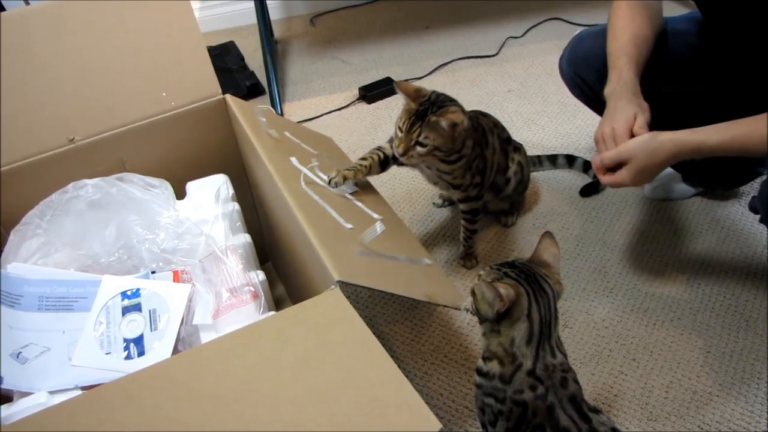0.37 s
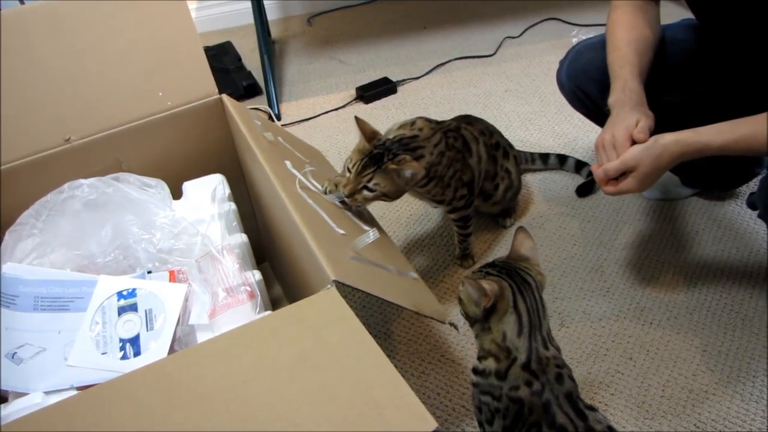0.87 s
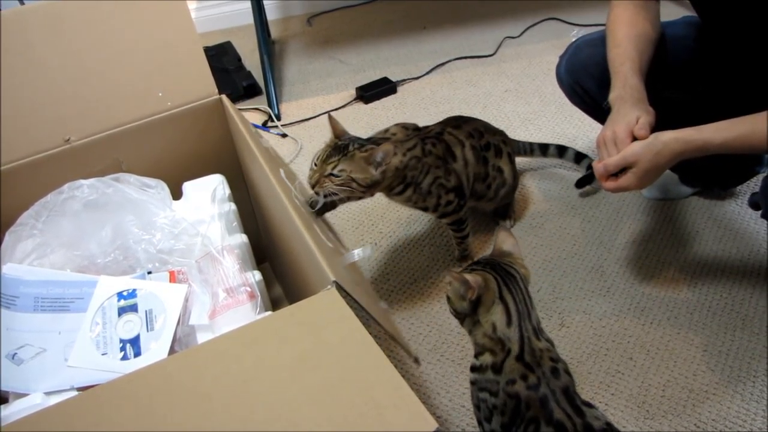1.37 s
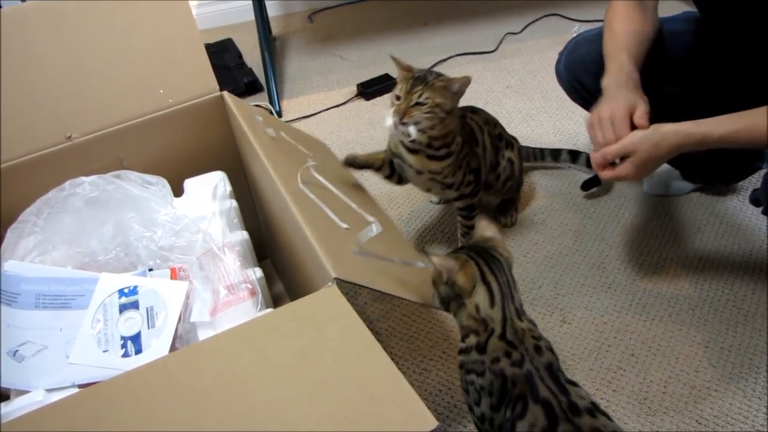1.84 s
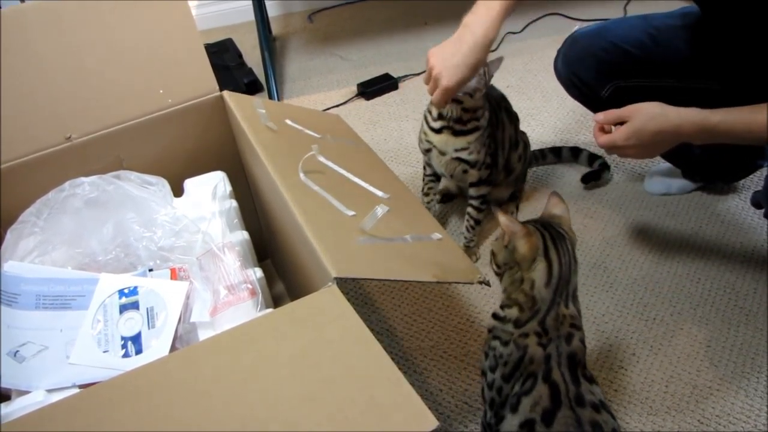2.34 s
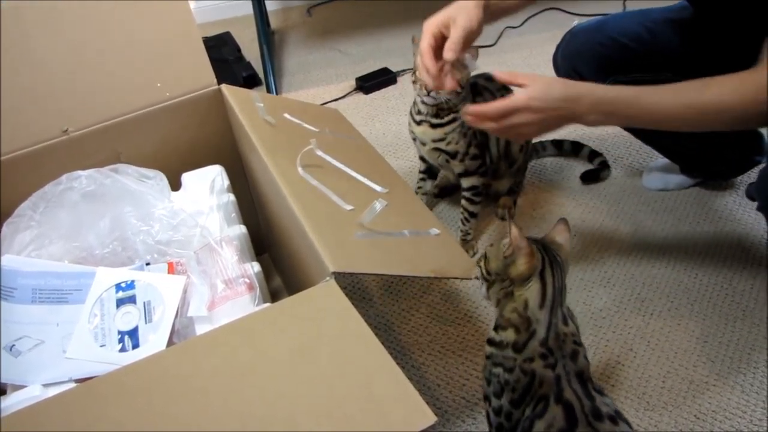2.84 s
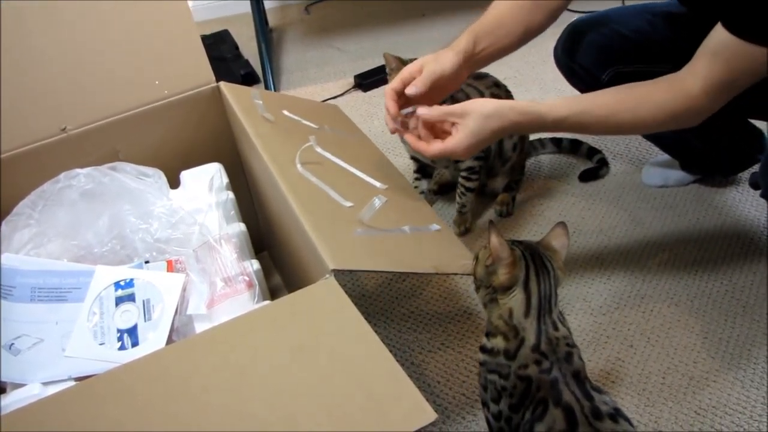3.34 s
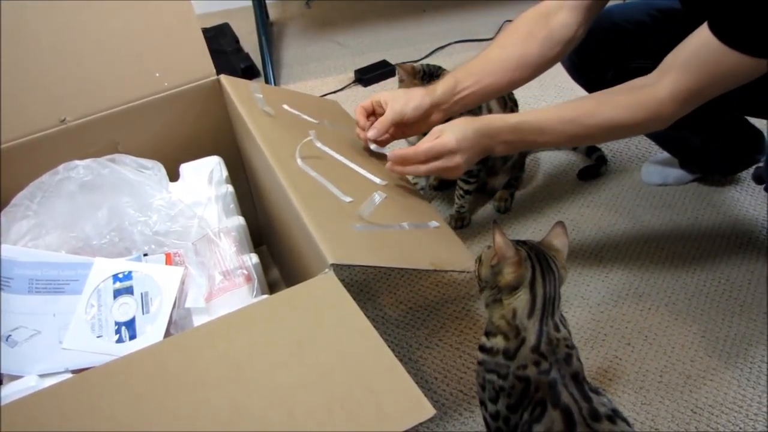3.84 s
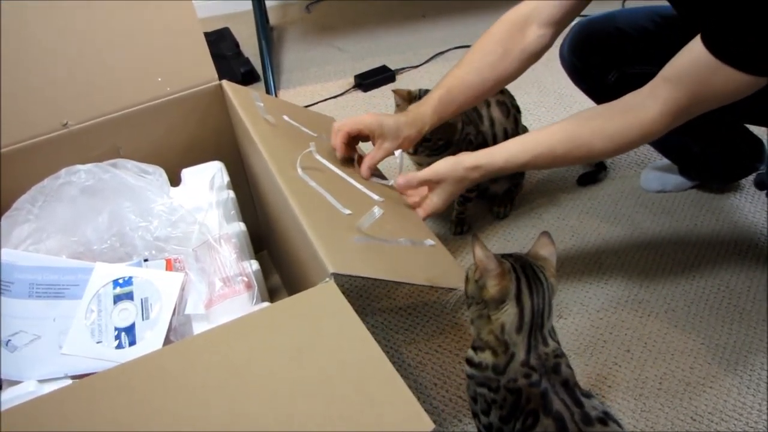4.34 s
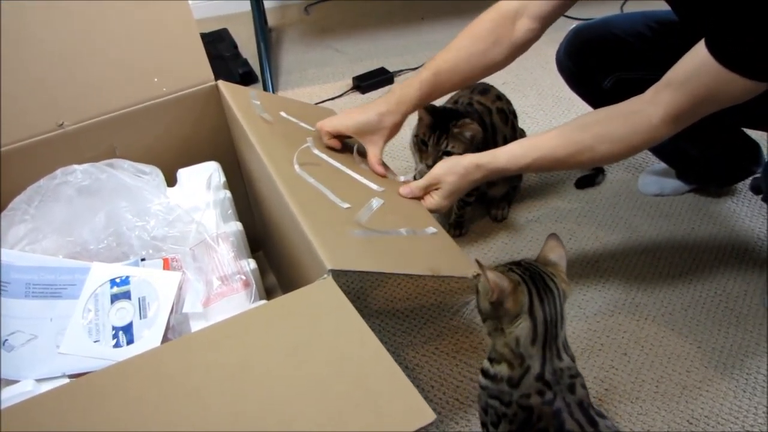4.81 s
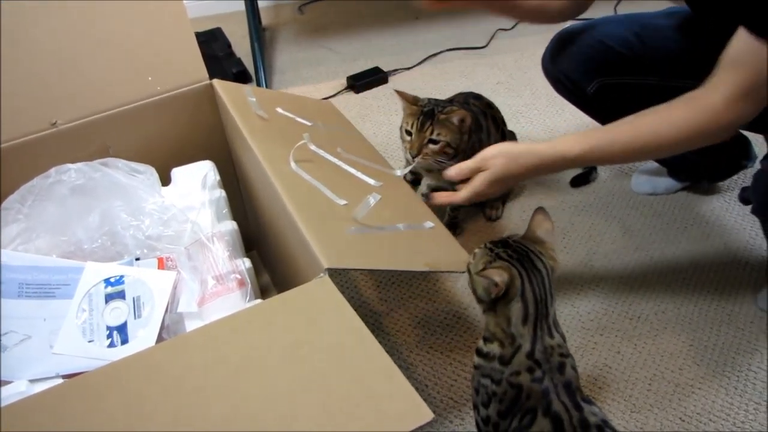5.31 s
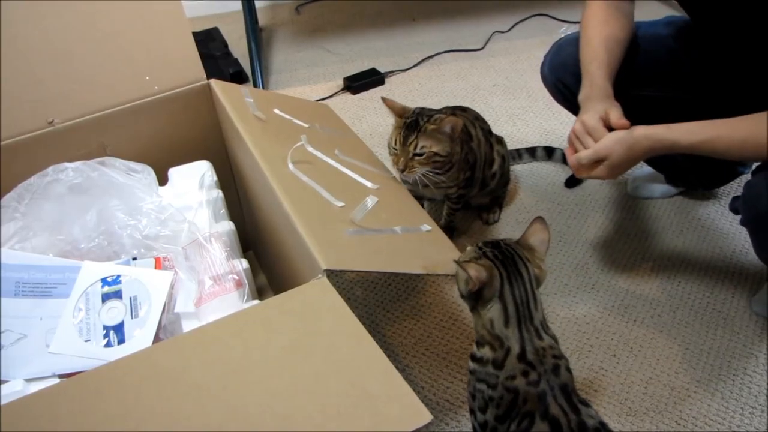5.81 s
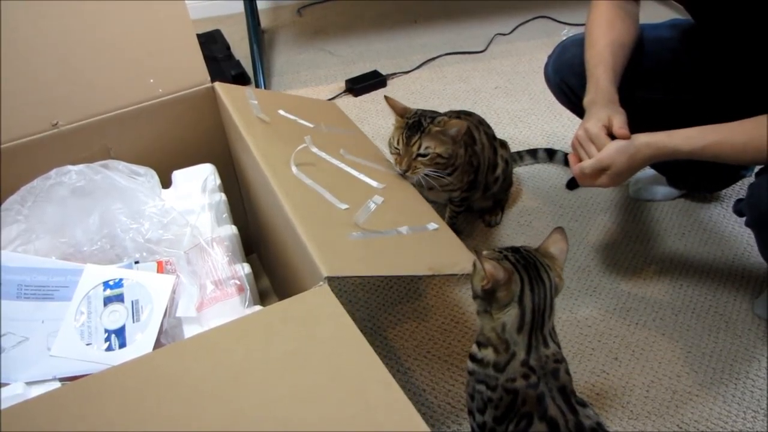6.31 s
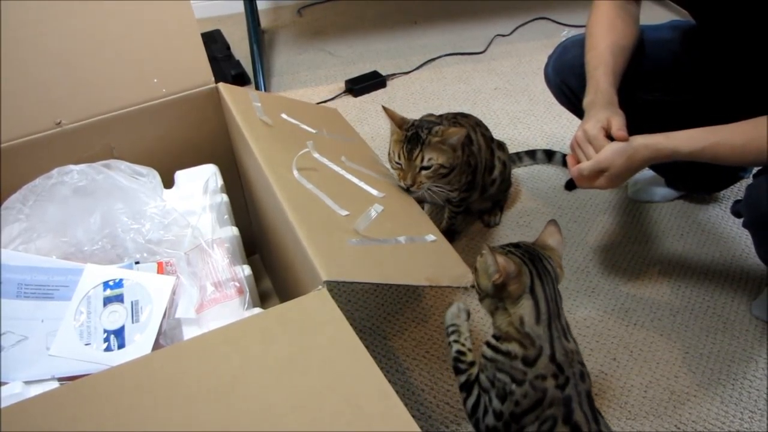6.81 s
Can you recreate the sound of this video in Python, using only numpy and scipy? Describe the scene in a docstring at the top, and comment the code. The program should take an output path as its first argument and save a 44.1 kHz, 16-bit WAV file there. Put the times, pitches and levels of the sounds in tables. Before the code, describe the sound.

Dry, near sounds of packing tape and cardboard over steady quiet air noise. Light claw strokes and isolated clicks build to a sharp crackling rip before two seconds. A lull gives way to crisp tape ticks, then deep box thumps, finger rubs and snappy crinkles around four and a half to five seconds. Small uneven scratches finish, with a short, soft room response.

```python
"""In a carpeted room, cats paw, claw and tug at packing tape on the flap of a cardboard box; hands press it back.
Glue letting go and tape buckling give snaps: short decaying tones with bright cracks, in one place a dense rip.
Strokes make bursts of tiny slips, coloured as cardboard scrape and tape crinkle.
Blows thump by ringing the flap's modes; its swings are swells of low noise.
A steady ventilation and microphone hush lies beneath, and decaying noise tails answer as the room."""
import sys
import numpy as np
from scipy import signal
from scipy.fft import rfft, irfft, next_fast_len
from scipy.io import wavfile
from scipy.ndimage import uniform_filter1d

SR = 44100
rng = np.random.default_rng(int(sys.argv[2]) if len(sys.argv) > 2 else 0)


def level_to_linear(level):
    """Convert decibel levels to linear amplitude factors, elementwise."""
    exponent = np.asarray(level, float) / 20
    return 10 ** exponent


def waveform_to_disk(signal):
    """Save audio, clipped to [-1, 1], as 16-bit WAV at the path in sys.argv[1]."""
    frames = np.transpose(np.atleast_2d(signal))
    scaled = np.clip(frames, -1, 1) * 32767
    samples = np.round(scaled).astype(np.int16)
    wavfile.write(sys.argv[1], SR, samples)


N = 305172  # length [samples]

# spectrum of ventilation and microphone noise: (frequency [Hz], level [dB per Hz])
HUSH_SPECTRUM = [(15, -51), (25, -6), (78, 1), (170, -7), (451, -9), (560, -15), (695, -15), (863, -8.5),
                 (1190, -6), (1400, -22), (2690, -24.5), (3620, -22.5), (7920, -26), (13600, -29),
                 (16000, -23.5)]
HUSH_DB = -56
# spectrum of low air pushed by the flap: (frequency [Hz], level [dB per Hz])
SWAY_SPECTRUM = [(12, -28), (20, -10), (59, 5), (97, -6), (140, -2), (159, -11), (182, -27), (250, -7),
                 (320, -102), (550, -120)]
# the flap swinging after a push: (peak time [s], length [s], level [dB])
FLAP_SWINGS = [(0.0, .2, -44.5), (0.403, .2, -50), (0.594, 0.43, -47.5), (1.15, .4, -43),
               (1.64, 0.52, -44.5), (1.766, 0.32, -41), (1.932, 0.15, -37), (2.005, .12, -41),
               (3.053, 0.23, -48), (3.22, 0.41, -50), (3.83, 0.32, -48.5), (4.09, 0.33, -43.5),
               (4.454, 0.25, -35), (4.625, .15, -49), (4.69, 0.17, -33.5), (4.903, 0.53, -48),
               (5.2, 0.37, -37), (5.33, 0.14, -38.5), (5.92, 0.66, -46), (6.11, .2, -61), (6.57, 0.33, -43)]
SWING_RISE, REST_SWAY_DB = 0.41, -56.5  # rise over fall time; tremble between the swings
# modes of the flap: (frequency [Hz], level [dB], decay by 60 dB [s])
FLAP_MODES = [(75.5, -37, 0.1), (93, 2, 0.088), (135.2, 2, 0.13), (214.5, -7, 0.34), (254.5, 7, 0.069),
              (306, 2, 0.16), (459.6, -0.5, 0.22), (618, -15.5, 0.48), (827, -3, 0.32), (1066, 7.5, 0.07),
              (1500, -24, 0.043)]
# paws and fingers landing on the flap: (time [s], peak level [dB], favoured pitch [Hz], breadth [log pitch])
FLAP_BLOWS = [(0.325, -23, 249, 0.18), (0.547, -36, 277, 0.15), (1.1, -43, 332, 0.11),
              (1.476, -36, 247, 0.86), (1.5, -44, 128, 0.26), (1.624, -28, 234, 0.21),
              (1.679, -22, 825, 0.16), (1.72, -22, 270, 0.94), (1.734, -24, 128, 0.19), (1.75, -24, 308, 1),
              (1.921, -54, 127, 0.33), (3.107, -41.5, 215, 0.47), (3.396, -53, 115, 1),
              (3.82, -34, 134, 0.56), (4.037, -38.5, 221, 0.31), (4.085, -41, 248, 0.55),
              (4.342, -34, 132, 1), (4.429, -45, 634, 0.57), (4.461, -35, 227, 0.39),
              (4.66, -14.5, 122, 0.64), (4.785, -33.5, 310, 1), (4.961, -22.5, 154, 0.94),
              (5.153, -19.5, 281, 0.13), (5.278, -28, 137, 0.17), (5.929, -43, 103, 1),
              (6.244, -37.5, 235, 0.24), (6.327, -47, 278, 0.75), (6.541, -38, 240, 0.35),
              (6.841, -41.5, 143, 0.78)]
# paw, teeth and finger strokes, rise and fall spanning 20 dB:
# (peak time [s], rise [s], fall [s], cardboard scrape level [dB], tape crinkle level [dB])
STROKE_EVENTS = [(0.0, .1, 0.14, -48, -46), (0.346, 0.018, 0.083, -33.5, -33),
                 (0.554, 0.0067, 0.087, -44, -47), (.72, 0.37, 0.12, -55.5, -58),
                 (.84, .04, 0.027, -55, -58), (.912, 0.049, 0.064, -57, -56), (.98, 0.039, 0.14, -53, -58),
                 (1.021, 0.019, 0.14, -59, -45.5), (1.101, 0.11, 0.22, -55.5, -42),
                 (1.15, 0.12, .04, -49, -52), (1.181, 0.013, .08, -43.5, -62),
                 (1.215, 0.029, 0.13, -46.5, -42), (1.29, .08, .08, -50, -54),
                 (1.386, 0.11, 0.11, -40.5, -39.5), (1.45, 0.025, 0.042, -60, -54),
                 (1.478, 0.013, 0.051, -32.5, -33), (1.566, .06, 0.037, -46, -52),
                 (1.606, 0.0069, 0.18, -38, -36), (1.676, 0.063, 0.097, -28, -22.5),
                 (1.738, 0.12, 0.088, -23, -22), (1.82, .05, 0.18, -54, -61), (1.888, .04, 0.092, -69, -58),
                 (1.959, 0.26, 0.31, -52.5, -53), (2.05, .3, 0.16, -64, -53), (2.247, .012, 0.17, -60, -48),
                 (2.373, .02, 0.16, -62, -52), (2.486, 0.024, .25, -57, -40.5),
                 (2.584, 0.1, 0.12, -74, -38), (2.621, 0.082, 0.044, -56, -32), (2.66, .03, 0.13, -68, -50),
                 (2.73, 0.046, .06, -70, -49), (2.85, 0.45, 0.13, -62.5, -47.5), (3.17, 1, 0.6, -56.5, -63),
                 (3.401, 0.011, 0.048, -40, -43.5), (3.468, 0.042, .2, -57, -52),
                 (3.668, 0.13, 0.64, -63, -47), (3.789, 0.26, .05, -69, -46),
                 (3.855, 0.15, 0.02, -55.5, -46), (3.9, .05, 0.092, -55, -75),
                 (4.042, 0.0081, 0.25, -53, -41), (4.073, 0.029, 0.21, -42, -67),
                 (4.336, 0.061, 0.091, -49, -53.5), (4.4, .012, 0.056, -40, -58),
                 (4.437, 0.054, 0.17, -30, -32.5), (4.506, 0.059, 0.085, -55, -36),
                 (4.54, 0.056, 0.12, -55, -41.5), (4.667, 0.019, .3, -44, -44.5),
                 (4.79, .015, 0.11, -40, -65), (4.86, 0.081, .1, -57, -61), (4.942, 0.14, 0.1, -50, -36),
                 (5.076, 0.32, 0.061, -37, -36), (5.18, 0.075, 0.054, -32.5, -34),
                 (5.332, 1, 0.23, -42, -45), (5.6, 0.016, .1, -51, -45), (5.64, 0.078, 0.051, -61, -41.5),
                 (5.753, 0.056, 0.046, -58, -52), (5.825, .025, 0.96, -55.5, -56),
                 (5.984, 0.86, 0.041, -54, -53), (6.176, 0.14, 0.26, -73, -88),
                 (6.241, 0.0096, .03, -46.5, -42), (6.27, 0.038, 0.26, -46.5, -51),
                 (6.352, 0.06, 0.19, -42.5, -42), (6.546, .5, .11, -50.5, -50.5),
                 (6.844, 0.23, .08, -56, -56.5), (6.88, 0.013, 0.11, -55, -53)]
REST_SCRAPE_DB = -64.5  # faint cardboard contact between the strokes
RISE_CURVE, FALL_CURVE = 0.95, 0.71  # 1 = straight in dB; less = sharper peak, longer skirt
# spectrum of scraped cardboard: (frequency [Hz], level [dB per Hz])
BOARD_SPECTRUM = [(88, -60), (150, -0.5), (270, 3.5), (530, -5), (776, -3), (1280, -4.5), (1590, -6),
                  (1930, -10), (2140, -9.5), (5000, -24), (6500, -78), (11000, -120)]
# spectrum of crinkling tape: (frequency [Hz], level [dB per Hz])
FILM_SPECTRUM = [(1200, -13), (2000, -2.5), (2450, -2), (2750, -0.5), (3100, -4), (3800, -6), (6000, -7.5),
                 (12000, -15), (16000, -8)]
# the loose strip of tape: (time [s], centre of its crinkle [Hz], strength of that centre [dB],
# brightness [dB per octave])
STRIP_COLOUR = [(0, 3900, 8, 5.5), (.35, 4160, -2, -4.5), (.85, 3830, 1, -1.5), (1.02, 6300, 2, 1),
                (1.1, 7000, 2, 6), (1.3, 7200, 1, 1.5), (1.384, 3630, 1, -0.5), (1.475, 8200, -3, -1.5),
                (1.55, 4500, -3, 2), (1.66, 5000, 4.5, 0.5), (1.78, 4900, -3, 2.5), (2.2, 4130, 7, 1),
                (2.3, 4300, 4, -4.5), (2.37, 9200, 5, -2.5), (2.48, 4800, 2, 1.5), (2.56, 6100, 14, 3),
                (2.65, 6400, -4, 3), (2.83, 3770, 1.5, 1), (3.4, 5400, 3, 1.5), (3.6, 5070, 3, 0.5),
                (3.66, 6540, 12, 1), (3.75, 6600, 2, 3), (3.79, 8600, 10, -1), (3.87, 8800, -4, 5),
                (4.04, 3900, -1, 3), (4.43, 5560, 1, -2), (4.52, 6500, 3, 4), (4.67, 4000, 2, 3.5),
                (4.9, 4270, 2.5, 3.5), (4.935, 3520, 11, 2.5), (4.965, 2870, 3, 1), (5.0, 2700, 1, 1.5),
                (5.08, 4930, 3.5, 3.5), (5.45, 4440, 2, -0.5), (5.628, 4970, 3, 4.5), (5.75, 2600, -3, -2),
                (5.9, 4000, 0, 4), (6.26, 5300, 4, -1), (6.38, 5000, 7, 1.5), (6.55, 7000, 1, 4.5),
                (6.92, 6360, 3, -1)]
# glue letting go and tape buckling: (time [s], peak level [dB], ring [Hz], ring decay [cycles],
# crack level over the ring [dB])
TAPE_SNAPS = [(0.329, -44, 2370, 0.7, -14), (0.341, -18.5, 2650, 0.39, -25), (0.552, -32, 3260, 1.5, 0),
              (0.7666, -40, 2580, 1.2, -27), (0.8376, -42, 1940, 1.4, -23), (1.0167, -31, 5800, 0.28, -17),
              (1.1774, -38, 1920, 0.57, -17), (1.197, -37, 6290, 0.7, -12),
              (1.2102, -26.5, 8400, 0.26, 3.5), (1.2567, -32.5, 2630, 1.1, -16),
              (1.2804, -33, 8870, 1.01, -2), (1.4734, -20.5, 10200, 1.1, 8.5), (1.57, -50, 1970, 0.51, -11),
              (1.6028, -12, 11410, 0.65, 3), (1.615, -22, 6400, 0.9, -21), (1.6268, -18, 10030, 1.3, -9),
              (1.6425, -10, 7020, 0.41, -13), (1.6526, -12, 7620, 0.79, -13), (1.6612, -15, 4960, 0.97, 2),
              (1.6684, -11, 8350, 0.72, -11), (1.682, -12, 3430, 0.61, -18), (1.712, -14, 2500, 0.6, 9),
              (1.727, -18, 4030, 0.49, -14), (1.7363, -13, 2530, 0.33, -1), (1.749, -9, 1610, 0.45, -3),
              (1.758, -11, 9300, 1.1, 3.5), (2.2435, -25.5, 3950, 2.3, -35),
              (2.2552, -29.5, 5030, 2.9, -35), (2.3177, -44, 2410, 1.1, -24),
              (2.3452, -39.5, 2290, 1.6, -21), (2.3706, -38, 8900, 2.3, -5), (2.4836, -37, 9600, 0.87, -4),
              (2.4933, -29.5, 5000, 1.1, -15), (2.5362, -28.5, 5530, 1.5, -24),
              (2.5545, -20.5, 4500, 0.71, -24), (2.587, -25.5, 3150, 1.6, -15),
              (2.597, -25.5, 6560, 1.5, 3), (2.6133, -15, 8100, 1.7, -13), (2.6193, -25, 8700, 1.7, -13),
              (2.623, -19.5, 6230, 2.9, -6), (2.72, -34, 7260, 1.6, -11), (3.2508, -36, 2450, 1.9, -13),
              (3.3696, -39, 1540, 0.35, -14), (3.4016, -34, 1410, 0.74, -2), (3.4641, -36, 3200, 1.6, 8),
              (3.6035, -39, 4900, 1.8, -24), (3.786, -29.5, 8600, 0.95, 5.7),
              (3.8402, -34, 1880, 0.87, -13), (4.0409, -22.5, 2590, 0.36, -28),
              (4.1153, -20, 5700, 0.55, -11), (4.3414, -33, 5850, 0.93, -8), (4.3874, -37, 2350, 0.26, 4),
              (4.399, -30, 1710, 0.6, -27), (4.432, -21.5, 6560, 0.87, -11), (4.5004, -12.5, 6450, 2, -3),
              (4.5093, -19, 6120, 2.1, -12), (4.6635, -30, 2000, 1.7, -18), (4.7868, -30, 1670, 1.2, -30),
              (5.07, -26, 1380, 0.37, -4), (5.1542, -23, 1550, 0.51, -6), (5.1789, -27.5, 1400, 0.32, -9),
              (5.5784, -42, 1760, 0.53, -11), (5.7011, -39, 9350, 2.1, -1.1),
              (5.7387, -33.5, 2540, 2.2, -21), (5.8195, -20.5, 3050, 0.45, -2.5),
              (5.8985, -39, 6890, 1.5, -6), (6.0993, -48, 7600, 1.8, -9), (6.2367, -28, 2300, 0.91, -20),
              (6.2581, -29.5, 5300, 3.1, -33), (6.327, -24, 1420, 0.23, -1), (6.3412, -18, 5500, 2.2, 5.5),
              (6.5276, -29, 6650, 3.7, -23), (6.7244, -41.5, 2570, 0.9, -17), (6.793, -40, 3920, 1.3, -37),
              (6.8102, -39.5, 7900, 3.2, -15), (6.879, -44, 6100, 2.5, -13)]
RIP_START_S, RIP_END_S, RIP_PER_S = 1.608, 1.77, 130  # the strip rips off the flap in a run of small snaps
RIP_DB, RIP_HZ = 12.5, 6000  # their peak over the crinkle, their usual ring
PAN_DB, PAN_DB_PER_OCTAVE, PAN_SCATTER_DB = -1.5, 2.5, 4.5  # left over right at 5 kHz; duller lies further right
# stereo difference of the noise sounds: (frequency [Hz], side over mid [dB])
SIDE_OVER_MID = [(60, -16), (150, -17), (380, -14), (950, -8), (2380, -4), (5980, -6), (15000, -4)]
# reverberation of the room: (frequency [Hz], decay by 60 dB [s])
ROOM_DECAY = [(100, 0.12), (500, 0.37), (2000, 0.27), (6000, 0.18), (14000, 0.11)]
# response of the microphones: (frequency [Hz], gain [dB])
MICROPHONE_RESPONSE = [(20, 7), (60, -0.5), (9000, 1.5), (12500, -2), (15500, -10)]
TOP_HZ = 15800  # upper band limit
LEFT_LAG_S = .000014  # left microphone after the right


def unit(x):
    """Normalisation of power: scale to rms 1."""
    return x / np.sqrt(np.mean(x ** 2) + 1e-20)


def along(points, hz):
    """Interpolation on a logarithmic frequency axis."""
    f, v = np.transpose(points)
    return np.interp(np.log(hz + 1), np.log(f + 1), v)


def filtered(x, response):
    """Linear filtering: the spectrum is multiplied by a response of frequency."""
    m = next_fast_len(N + SR // 2)
    return irfft(rfft(x, m) * response(np.fft.rfftfreq(m, 1 / SR)), m)[..., :N]


def spread(pair, spectrum):
    """Mid-side stereo: two coloured signals add and subtract; close microphones differ mostly in the treble."""
    def response(hz):
        return level_to_linear(along(spectrum, hz)) * np.array([hz * 0 + 1, level_to_linear(along(SIDE_OVER_MID, hz))])

    mid, side = filtered(pair, response)
    return np.array([mid + side, mid - side])


def swells(s, rise, fall, db, rest_db=-120):
    """Summation of power: overlapping swells sink 20 dB in their rise and fall times; gives dB per sample."""
    coarse = np.arange(0, N + 32, 32)
    t = coarse / SR - s[:, None]
    rising = np.abs(t / rise[:, None]) ** RISE_CURVE
    falling = np.abs(t / fall[:, None]) ** FALL_CURVE
    shape_db = -20 * np.where(t < 0, rising, falling)
    power = np.sum(level_to_linear(db[:, None] + shape_db) ** 2, axis=0) + level_to_linear(rest_db) ** 2
    return np.interp(np.arange(N), coarse, 10 * np.log10(power))


def slips(per_s, scatter_db, life_s):
    """Stick-slip friction: noise in bursts, many tiny slips of very uneven size, each dying fast."""
    size = level_to_linear(scatter_db * rng.exponential(1, N).clip(0, 4))
    kicks = (rng.random(N) < per_s / SR) * size
    bursts = signal.lfilter([1], [1, -np.exp(-1 / (life_s * SR))], kicks)
    # even out the power over a thirtieth of a second
    bursts /= np.sqrt(np.abs(uniform_filter1d(bursts ** 2, size=SR // 30)) + 1e-9)
    return bursts * rng.standard_normal((2, N))


def hush():
    """Stationary broadband noise of ventilation and microphones."""
    return level_to_linear(HUSH_DB) * unit(spread(rng.standard_normal((2, N)), HUSH_SPECTRUM))


def room(x):
    """Reverberation: walls answer with a noise tail dying faster in the treble, redrawn every sixth of a second."""
    wet, step = np.zeros((2, N + 2 * SR)), SR // 6
    for start in range(0, N, step):
        hz, t, z = signal.stft(rng.standard_normal((2, SR // 2)), SR, nperseg=256)
        decay = level_to_linear(-60 * t / along(ROOM_DECAY, hz)[:, None])
        tail = signal.istft(z * decay, SR, nperseg=256)[1]
        tail = tail / np.linalg.norm(tail[0])
        part = signal.fftconvolve(x[None, start:start + step], tail, axes=1)
        wet[:, start + 130:][:, :part.shape[1]] += part  # the tail starts 3 ms late
    return spread(wet[:, :N], [(1000, 0.011)])


def sway():
    """Radiation from a moving plate: the broad flap swings and pushes low air."""
    s, length, db = np.transpose(FLAP_SWINGS)
    level_db = swells(s, SWING_RISE * length, length, db, REST_SWAY_DB)
    return level_to_linear(level_db) * unit(spread(rng.standard_normal((2, N)), SWAY_SPECTRUM))


def thumps():
    """Modal excitation: a blow rings the flap's modes, favouring those near one pitch by where and how it lands."""
    out, t = np.zeros(N + SR), np.arange(SR // 2) / SR
    chance = rng.standard_normal((len(FLAP_BLOWS), len(FLAP_MODES)))
    hz, level_db, t60 = np.transpose(FLAP_MODES)[:, :, None]
    modes = level_to_linear(-60 * t / t60) * np.sin(2 * np.pi * hz * t)
    onset = np.clip(t / 0.00602, 0, 1) ** 3
    for (s, db, best_hz, breadth), luck in zip(FLAP_BLOWS, chance):
        favour = 1 / (1 + (np.log(hz / best_hz) / breadth) ** 2)
        strength = level_to_linear(level_db + 0.87 * luck[:, None]) * favour
        ring = np.sum(strength * modes, axis=0) * onset
        out[round(s * SR):][:len(t)] += level_to_linear(db) * ring / np.abs(ring).max()
    return out[:N]


def strokes():
    """Superposed gestures: each stroke drives scrape and crinkle together; gives both levels in dB per sample."""
    s, rise, fall, scrape_db, crinkle_db = np.transpose(STROKE_EVENTS)
    return swells(s, rise, fall, scrape_db, REST_SCRAPE_DB), swells(s, rise, fall, crinkle_db)


def scrape(level_db):
    """Stick-slip friction of claws and fingertips dragging over the cardboard."""
    rubbing = slips(per_s=1300, scatter_db=5.5, life_s=0.0075)
    return level_to_linear(level_db) * unit(spread(rubbing, BOARD_SPECTRUM))


def crinkle(level_db):
    """Buckling of a thin film: free length sets a moving centre of colour, stiffness the brightness."""
    uneven_db = np.clip(1.3 + .4 * (level_db + 37), 1.3, 4.8)  # a hard pull tears in big uneven jumps
    crackles = slips(per_s=1100, scatter_db=uneven_db, life_s=.0015)
    hz, t, z = signal.stft(crackles, SR, nperseg=128)
    hz = hz[:, None]
    s, centre_hz, centre_db, brightness_db = np.transpose(STRIP_COLOUR)
    from_centre = np.log((hz + 1) / np.interp(t, s, centre_hz))
    hump_db = np.interp(t, s, centre_db) * np.exp(-(from_centre / .17) ** 2)
    tilt_db = np.interp(t, s, brightness_db) * np.log2(np.maximum(hz, 2000) / 4000)
    colour = level_to_linear(hump_db + tilt_db + along(FILM_SPECTRUM, hz))
    colour /= np.sqrt(np.mean(colour ** 2, axis=0))  # colour moves, power does not
    coloured = signal.istft(z * colour, SR, nperseg=128)[1][:, :N]
    return level_to_linear(level_db) * unit(spread(coloured, [(1000, 0)]))


def rip(crinkle_db):
    """Peeling by jumps: rows like TAPE_SNAPS at a steady but uneven pace, as strong as the pull."""
    s = np.arange(RIP_START_S, RIP_END_S, 1 / RIP_PER_S)
    luck = rng.standard_normal((len(s), 4)).T
    s = s + .3 * luck[3] / RIP_PER_S
    db = crinkle_db[(s * SR).astype(int)] + RIP_DB + 3 * luck[0]
    hz = np.minimum(RIP_HZ * np.exp(0.7 * luck[1]), SR / 4)
    cycles = 0.48 * np.exp(0.24 * luck[2])
    crack_db = s * 0 - 9
    return np.transpose([s, db, hz, cycles, crack_db])


def snaps(crinkle_db):
    """Sudden release of tension: the tape rings for a few cycles and gives a short bright crack."""
    rows = np.concatenate([rip(crinkle_db), TAPE_SNAPS])
    out, t = np.zeros((2, N + SR)), np.arange(600) / SR
    # differencing takes the bass out of the cracks
    grit = signal.lfilter([1, -1], [1, -.55], rng.standard_normal((len(rows), 600)))
    places = rng.standard_normal(len(rows))
    for (s, db, hz, cycles, crack_db), noise, place in zip(rows, grit, places):
        swell = (1 - np.exp(-t * hz * 3)) * np.exp(-t * hz / cycles)
        ring = swell * np.sin(2 * np.pi * hz * t) / swell.max()
        crack = np.exp(-t / 0.00057) * noise
        sound = level_to_linear(db) * (ring + level_to_linear(crack_db) * crack / np.abs(crack).max())
        pan_db = PAN_DB + PAN_DB_PER_OCTAVE * np.log2(hz / 5000) + PAN_SCATTER_DB * place
        out[:, round(s * SR):][:, :600] += level_to_linear(pan_db * np.array([[.5], [-.5]])) * sound
    return out[:, :N]


def scene():
    """Superposition of direct and reverberant sound: each source drives the room at its own level."""
    scrape_db, crinkle_db = strokes()
    tape = snaps(crinkle_db)
    flap = thumps()
    rubbing = scrape(scrape_db) + crinkle(crinkle_db)
    to_room = level_to_linear(-6) * tape.mean(axis=0) + level_to_linear(-6.0) * flap + level_to_linear(-7.5) * rubbing.mean(axis=0)
    flap_pair = flap * level_to_linear([[.4], [-.4]])  # slightly to the left
    return tape + flap_pair + rubbing + room(to_room) + sway() + hush()


def top_cut(x):
    """Nothing passes above the cut-off."""
    return signal.sosfilt(signal.butter(12, 16640, fs=SR, output="sos"), x)


def record(dry):
    """Transduction: microphones fade in the top octave up to a band limit; the left is louder and slightly late."""
    def response(hz):
        balance = level_to_linear([[.3], [-.3]])
        delay = np.exp(-2j * np.pi * hz * np.array([[LEFT_LAG_S], [0]]))
        band_limit = 1 / (1 + (hz / TOP_HZ) ** 60)
        return balance * delay * level_to_linear(along(MICROPHONE_RESPONSE, hz)) * band_limit

    return top_cut(filtered(dry, response))


dry = scene()
out = record(dry)
waveform_to_disk(out)
```